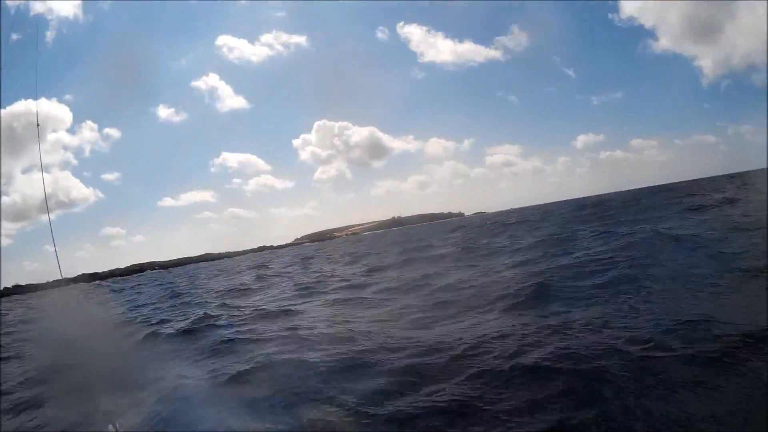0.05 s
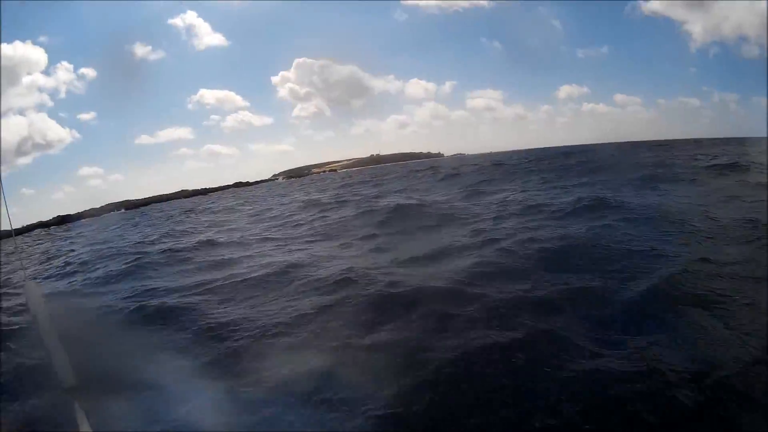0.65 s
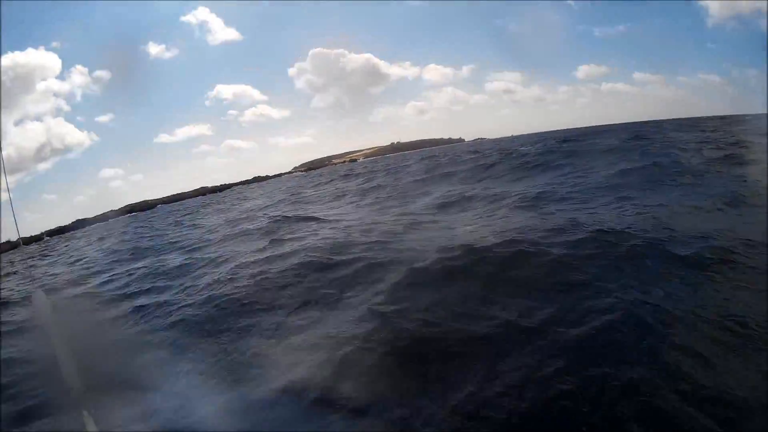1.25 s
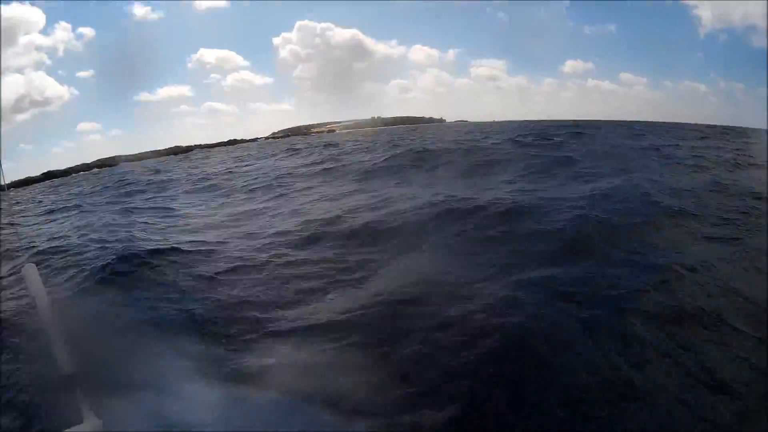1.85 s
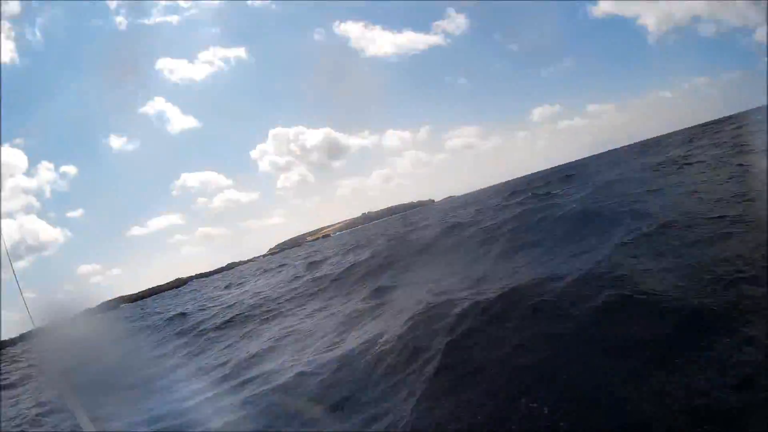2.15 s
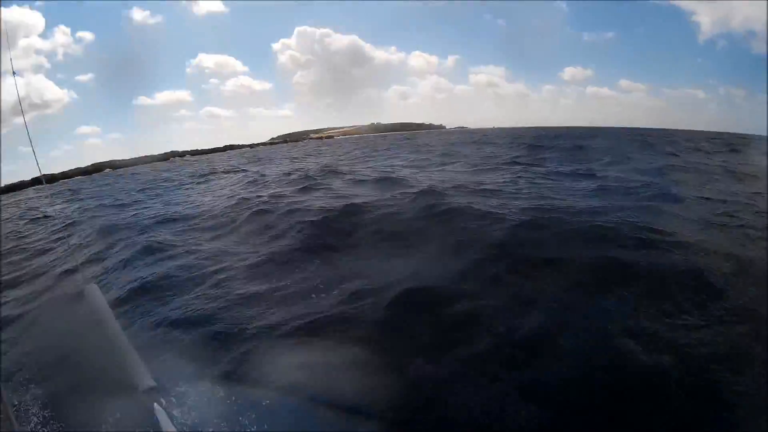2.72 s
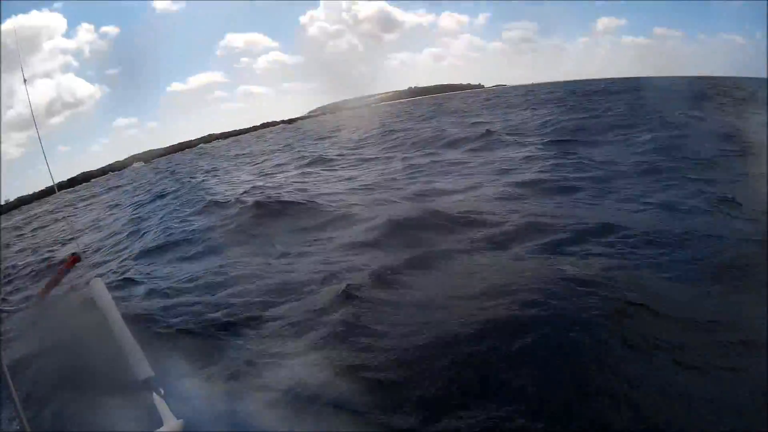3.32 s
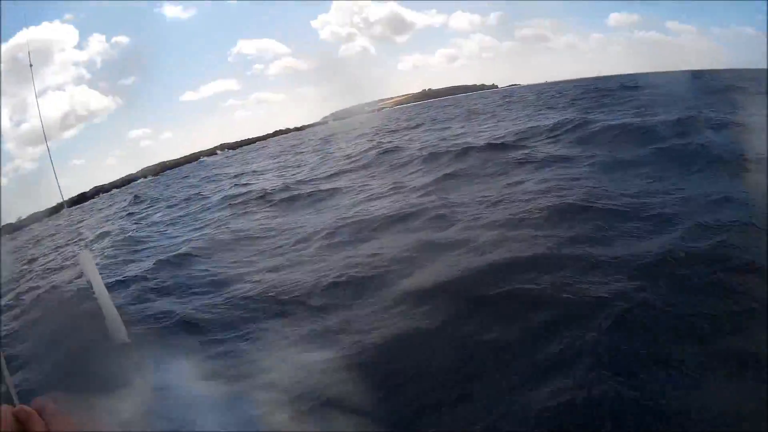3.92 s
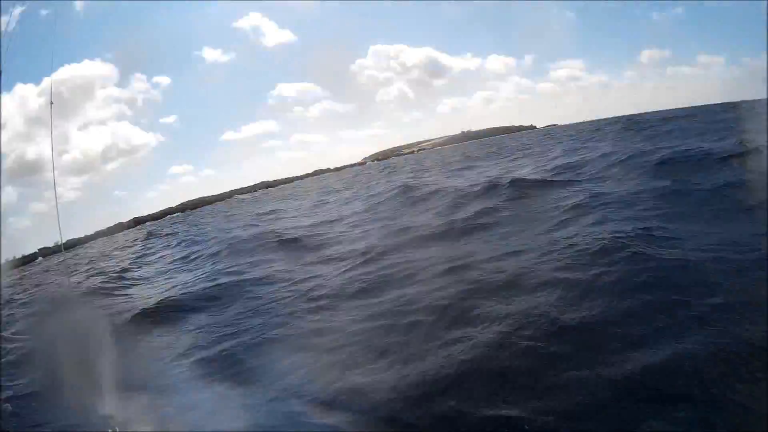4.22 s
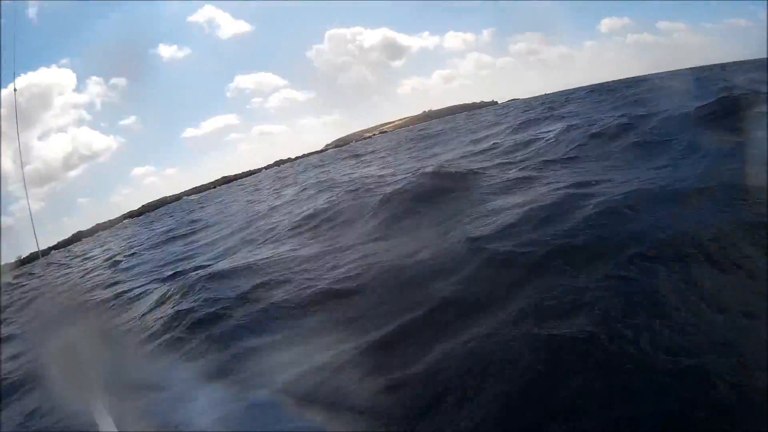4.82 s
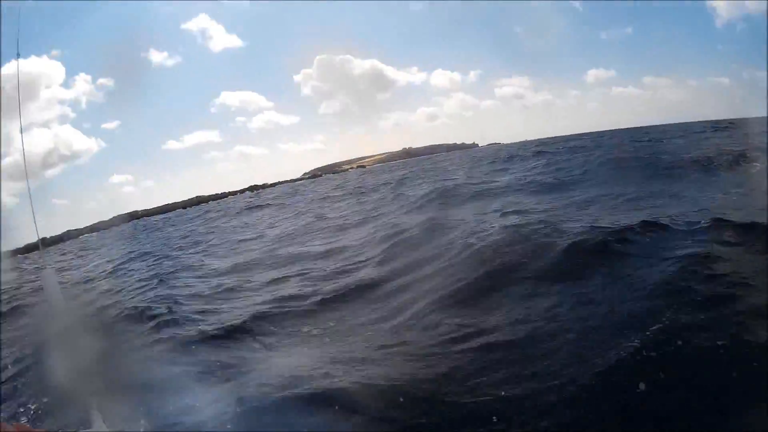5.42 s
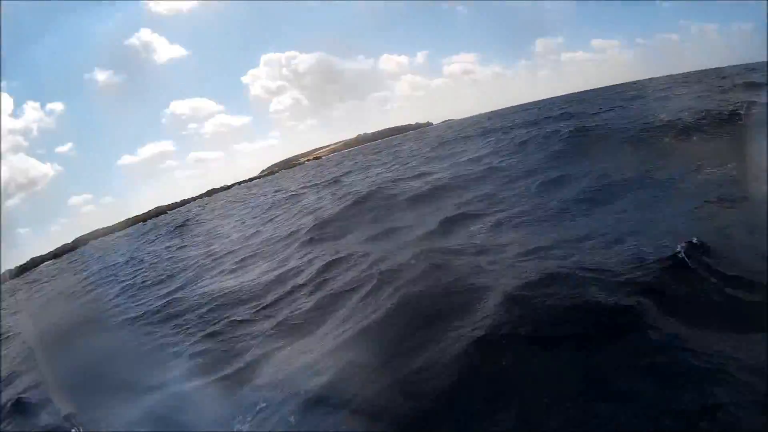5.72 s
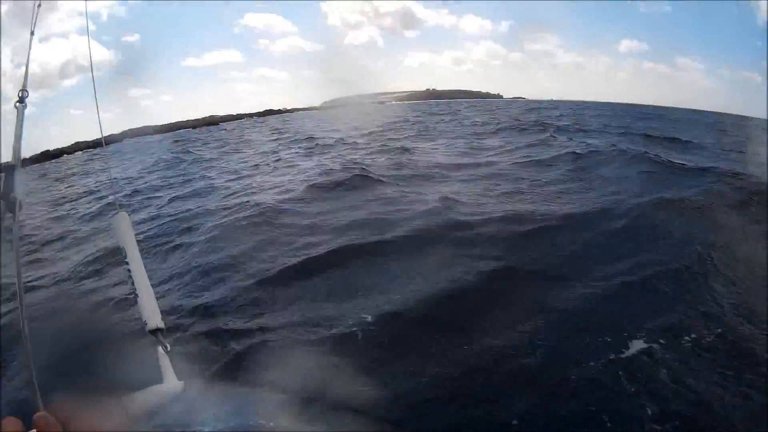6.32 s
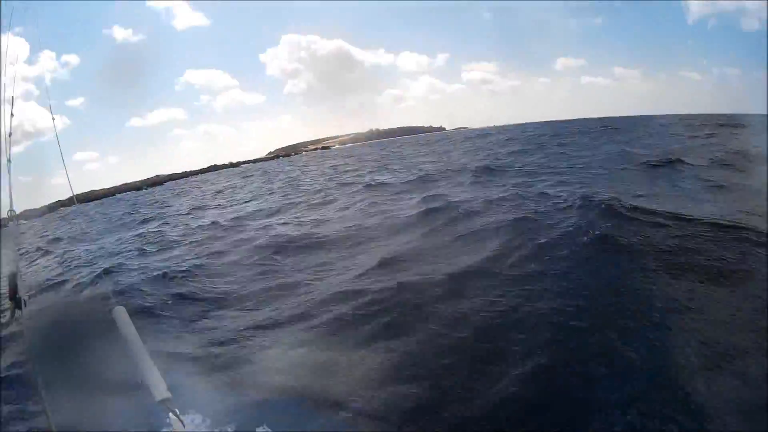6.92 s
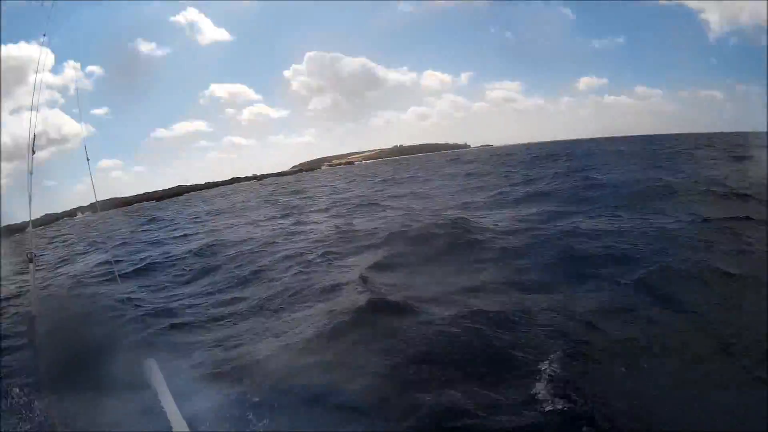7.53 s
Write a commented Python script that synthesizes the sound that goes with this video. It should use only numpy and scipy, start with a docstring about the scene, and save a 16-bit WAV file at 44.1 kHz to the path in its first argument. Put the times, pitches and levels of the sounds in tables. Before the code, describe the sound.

A dull rush of water and wind runs throughout as a small boat crosses choppy sea, heard from inside a waterproof case on deck. Fizzing wash, hollow slosh and low rumble swell and ease together, sounding muffled and boxy. At about 2.2 seconds a wave thumps the hull and the plastic mount knocks and snaps. More knocks and ticks follow until 3.2, with a short water gulp near 2.7 and another thump at 3.1. At 3.6 seconds spray slaps the case sharply and a few drops spatter after it. The heaviest low thump comes at 4 seconds, followed by sharp ticks. The rush swells around 5 seconds with a light knock, then drops as a single drop taps at 5.6. Softer thumps with knocks come near 6 and 6.5, a hollow gulp at 6.7, and a last soft thump and snap around 7.4 seconds.

```python
"""A dull rush of water and wind: a small boat in choppy sea, heard inside a waterproof camera case on deck.
Bow wash, slosh and rumble swell and ease together, boxed in by the closed case's resonances.
Each wave the hull meets gives a low thump, and the jolted mount knocks, ticks and snaps.
Now and then water gulps along the hull; midway, spray slaps and spatters on the case itself."""
import sys
import numpy as np
from scipy import signal
from scipy.fft import rfft, irfft
from scipy.io import wavfile
from scipy.ndimage import uniform_filter1d

SR = 44100
rng = np.random.default_rng(int(sys.argv[2]) if len(sys.argv) > 2 else 0)


def transcribe(signal):
    """Save signal, clipped to [-1, 1], as a 16-bit WAV file at the path in sys.argv[1]."""
    frames = np.atleast_2d(signal).T
    limited = np.clip(frames, -1, 1)
    pcm = np.round(limited * 32767).astype(np.int16)
    wavfile.write(sys.argv[1], SR, pcm)


N = 337806
TIME = np.arange(N) / SR


def undb(db):
    """Decibels to gain."""
    return 10 ** (np.asarray(db) / 20)


def unit(x):
    """Scale to rms 1."""
    return x / np.sqrt(np.mean(x ** 2))


def colour(x, eq):
    """Pass a sound through a minimum-phase, unit-energy EQ drawn as (freq_hz, gain_db) points."""
    size = 4096
    hz, db = np.transpose(eq)
    freqs = np.maximum(np.arange(size // 2 + 1) * SR / size, 1)
    octaves_above = np.maximum(np.log2(freqs / hz[-1]), 0)
    gain = undb(np.interp(np.log(freqs), np.log(hz), db) - 20 * octaves_above)
    cepstrum = irfft(np.log(gain))
    cepstrum[1:size // 2] *= 2  # folded, so nothing rings ahead of a hit
    cepstrum[size // 2 + 1:] = 0
    impulse = irfft(np.exp(rfft(cepstrum)))
    return signal.fftconvolve(x, impulse / np.sqrt(np.sum(impulse ** 2)))[:N]


def wander(rate_hz):
    """Smooth random drift with a spread near 1."""
    hold = int(SR / rate_hz)
    steps = rng.standard_normal(1024)[np.arange(N) // hold % 1024]
    return 1.3 * uniform_filter1d(uniform_filter1d(steps, hold), hold)


def crackle(per_s, spread_db):
    """Random tiny impacts, most small and a few large; rms 1."""
    fires = rng.random(N) < per_s / SR
    size = undb(spread_db * np.minimum(rng.exponential(size=N), 5))
    return unit(fires * size * np.sign(rng.standard_normal(N)))


def resonate(x, hz, width_hz):
    """One resonance, gain 1 at its centre."""
    return signal.lfilter(*signal.iirpeak(hz, hz / width_hz, fs=SR), x)


def hits(rows, eq):
    """One impulse per (start_s, level_db) row through an EQ, with the energy of 4 ms at that level."""
    impulses = np.zeros(N)
    for start_s, db in rows:
        impulses[int(start_s * SR)] += undb(db) * np.sqrt(0.004 * SR)
    return colour(impulses, eq)


def swing(peak_s, db, hz, half_s):
    """A few sine cycles that swell and die away around a moment."""
    t = TIME - peak_s
    return -undb(db) * np.sin(2 * np.pi * hz * t) * np.exp(-(t / half_s) ** 2)


def rush():
    """Swell in dB over cruising level: it builds as the bow digs into a wave, falls behind the crest."""
    # the rush of the boat's way: time_s, level_db
    contour = [(0, -51.5), (0.19, -49.5), (0.42, -53), (0.99, -54.5), (1.14, -51.5), (1.3, -53),
               (1.78, -49.7), (2.06, -52.5), (2.66, -52.5), (3.08, -53.5), (3.26, -56.5), (3.6, -54),
               (3.95, -57.5), (4.32, -53.9), (4.66, -53.5), (5.12, -49.1), (5.39, -49.5), (5.55, -56.9),
               (6.35, -56.5), (6.86, -55.5), (7.1, -52.2), (7.65, -53.5)]
    cruise_db = -53
    return np.interp(TIME, *np.transpose(contour)) - cruise_db


def bow_wash(surge_db):
    """Fizzing water comes through the wall and sets the air in the case singing."""
    # wash through the case: freq_hz, gain_db
    wash_eq = [(550, -16), (760, -13), (900, -8.5), (1060, -8), (1370, 0.5), (1560, -6.5), (1850, -4.5),
               (2150, -12), (2550, -21), (3000, -23.5), (3800, -22), (4500, -22.5), (5300, -43)]
    # narrow resonances of the enclosed air: pitch_hz, width_hz, gain_db
    air_modes = [(1360, 135, -3.5), (2980, 150, -9), (3220, 160, -17), (3570, 57, -10)]
    fizz = unit(rng.standard_normal(N) + undb(-4.5) * crackle(per_s=900, spread_db=3.0))
    water = colour(fizz, wash_eq) * undb(-51.5 + 1.1 * surge_db)
    air = unit(sum(undb(db) * resonate(rng.standard_normal(N), hz, width) for hz, width, db in air_modes))
    wall = signal.butter(4, [1000, 4200], "bandpass", fs=SR, output="sos")  # keeps the treble out
    air = signal.sosfilt(wall, air) * undb(-62.5 + 1.3 * surge_db)
    return (water + air) * undb(1.18 * wander(22.066))


def slosh(surge_db):
    """Water churns hollowly along the hull."""
    # slosh through the case: freq_hz, gain_db
    slosh_eq = [(250, -25), (330, -13), (420, -1.5), (470, -3), (525, 2), (580, -7), (680, -14.5),
                (950, -28.5)]
    return colour(rng.standard_normal(N), slosh_eq) * undb(-51.5 + 0.82 * surge_db + 1.4 * wander(14))


def wind(surge_db):
    """Wind rumbles on the case, wavering as it swells with the rush."""
    # wind through the case: freq_hz, gain_db
    rumble_eq = [(15, -4.5), (35, -4.5), (75, 2.5), (125, -3), (200, -1.5), (290, -7.5), (420, -17.5)]
    return colour(rng.standard_normal(N), rumble_eq) * undb(-51.5 + 0.75 * surge_db + 1.34 * wander(9))


def hull_thumps():
    """Waves shove the hull: it swings for a cycle or two and settles, loose parts chattering faintly."""
    # the hull meets a wave: peak_s, level_db, pitch_hz
    thumps = [(0.798, -49, 33), (2.153, -30, 32.3), (3.083, -28.5, 38), (4.044, -20.5, 45),
              (5.973, -39.5, 42), (6.451, -38, 44), (7.336, -42, 36)]
    # tone of the loose parts: freq_hz, gain_db
    chatter_eq = [(300, -4), (600, 1), (900, -4), (1500, 2), (2300, -4), (3100, -8), (4200, -19),
                  (6000, -35)]
    half_cycles = 0.67  # half the length of a thump
    shove = sum(swing(s, db, hz, half_cycles / hz) for s, db, hz in thumps)
    settle = sum(swing(s + 0.08, db - 16, hz=22, half_s=0.063) for s, db, _ in thumps)
    strain = sum(undb(db) * np.exp(-((TIME - s + 0.01) * hz / half_cycles) ** 2) for s, db, hz in thumps)
    chatter = undb(-26.5) * strain * colour(crackle(per_s=890, spread_db=3.5), chatter_eq)
    return shove + settle + chatter


def mount_rattle():
    """The jolted mount knocks in its play; its hard plastic joint slips and snaps back with a buzz."""
    # knocks, slips and snaps: start_s, level_db
    knock_cues = [(2.1593, -31.5), (2.4192, -34), (2.8036, -38.5), (3.0721, -36.5), (3.204, -34.5),
                  (3.4125, -47.5), (4.9793, -41), (5.9873, -43.5), (6.51, -34), (6.5811, -41.5)]
    tick_cues = [(2.2098, -39.5), (2.8155, -38), (4.0943, -30.5), (4.2066, -45), (4.245, -34),
                 (4.3255, -50), (6.5326, -46.5), (7.0536, -48.5)]
    snap_cues = [(2.2254, -33.5), (3.099, -33.5), (7.4271, -42.5)]
    # each contact's tone inside the case: freq_hz, gain_db
    knock_eq = [(100, -12), (450, -5.5), (750, -9.5), (1100, -11), (1380, 8), (1570, 1), (1820, 4),
                (2100, 4.5), (2600, -30.5), (3100, -7.5), (3550, -11.5), (4400, -21), (5500, -43),
                (12000, -69)]
    tick_eq = [(150, -11), (600, -4), (1000, -21), (1450, -6), (1730, 3.5), (2200, -4), (2650, -0.5),
               (3600, -1.5), (4400, 5.5), (5100, -6), (6300, -25), (8300, -21.5), (10000, -42),
               (15000, -48.5)]
    snap_eq = [(150, -11.5), (500, 0.5), (1200, 0), (1650, 6), (2200, 0), (3000, -8.5), (3650, -9),
               (4150, 3), (5000, -17), (6200, -11), (9500, -18), (11000, -32), (12200, -22), (14500, -44)]
    knocks = hits(knock_cues, knock_eq)
    ticks = hits(bounce(tick_cues, second_db=-12.5), tick_eq)
    snaps = hits(bounce(snap_cues, second_db=-4), snap_eq)
    snaps = scatter(snaps, share_db=-2.5, decay_s=0.0016)
    return case_ring(knocks + ticks + snaps, ring_db=-49.5)


def case_ring(x, ring_db):
    """The case rings on briefly after a blow."""
    # modes of the shell: pitch_hz, t60_s, gain_db
    modes = [(417, 0.078, 2.5), (550, 0.051, 0), (1300, .035, -5), (1357, 0.027, 2.5), (1710, 0.023, -10),
             (1956, 0.024, 2), (3050, .02, 0), (3600, .02, -7)]
    t = TIME[:SR // 8]
    ring = sum(undb(db) * np.sin(2 * np.pi * hz * t) * undb(-60 * t / t60) for hz, t60, db in modes)
    return x + undb(ring_db) * signal.fftconvolve(x, ring)[:N]


def bounce(rows, second_db, gap_s=0.0048):
    """Each (start_s, level_db) contact and its weaker second strike."""
    return np.vstack([rows, np.add(rows, [gap_s, second_db])])


def scatter(x, share_db, decay_s):
    """An impact breaks up into smaller ones over the next few milliseconds."""
    t = TIME[:SR // 50]
    fragments = rng.standard_normal(len(t)) * np.exp(-t / decay_s)
    fragments /= np.sqrt(np.sum(fragments ** 2))
    return x + undb(share_db) * signal.fftconvolve(x, fragments)[:N]


def gulps():
    """Water gulps along the hull in short, hollow notes."""
    # each gulp: peak_s, level_db, half_length_s
    cues = [(2.65, -45.5, .03), (6.696, -39, 0.016), (7.5, -67, 0.062)]
    return sum(swing(s, db, hz=524, half_s=half_s) for s, db, half_s in cues)


def splash():
    """Lumps of water mostly slap the case wall, drops mostly thud and spatter, amid fine spray."""
    # lumps of water, before the mix gains: start_s, slap_db, thud_over_slap_db
    lumps = [(3.579, -29, -9), (3.6073, -28, -16), (3.6121, -22, -5), (3.6204, -33, 9), (3.6263, -36, 2)]
    # single drops, before the mix gains: start_s, thud_db, spatter_db
    drops = [(3.599, -34, -52), (3.6401, -25.5, -37.5), (3.6486, -40, -45), (3.6609, -40, -39),
             (3.6664, -34.5, -47), (3.6957, -33, -47.5), (5.5943, -36.5, -46)]
    # low, middle and bright tones of water on the wall: freq_hz, gain_db
    thud_eq = [(50, -24), (130, -2), (230, -6), (400, -3.5), (580, 3), (780, -12), (1200, -19.5),
               (3000, -62)]
    slap_eq = [(150, -7.5), (500, -9.5), (800, -18), (1120, -12.5), (1360, 4), (1580, -2.5), (1760, 1.5),
               (2100, -6), (2550, -23), (3300, -23.5), (4200, -20.5), (5500, -45), (12000, -57)]
    spatter_eq = [(1200, -3), (2700, 9), (3400, 5), (4400, -0.5), (5400, -8.5), (7500, -7.5), (9600, -16),
                  (11500, -14.5), (13000, -26), (15000, -30)]
    lump_cues = [(s, db) for s, db, _ in lumps]
    weighted_cues = [(s, db + weight_db) for s, db, weight_db in lumps]
    drop_cues = [(s, db) for s, db, _ in drops]
    burst_cues = [(s, db) for s, _, db in drops]
    thud = undb(-2.5) * hits(weighted_cues + drop_cues, thud_eq)
    slap = undb(0.5) * hits(lump_cues, slap_eq) + undb(-8.5) * hits(drop_cues, slap_eq)
    burst = undb(-22) * hits(lump_cues, spatter_eq) + hits(burst_cues, spatter_eq)
    spatter = undb(-5.5) * scatter(burst, share_db=2.0, decay_s=0.0022)
    flex = swing(peak_s=3.6136, db=-21.5, hz=210, half_s=0.0035)  # the heaviest lump bends the wall
    fine = fine_spray()
    spray = sum(undb(db) * colour(fine, eq) for eq, db in [(slap_eq, -3), (thud_eq, -5.5), (spatter_eq, -17.5)])
    return flex + case_ring(slap - thud + spatter + spray, ring_db=-52.5)


def fine_spray():
    """Each sheet of spray is a patter of tiny drops that swells fast and fades more slowly."""
    # sheets hitting the case: peak_s, level_db
    sheets = [(3.578, -38), (3.612, -22.5), (3.66, -39)]
    rise_s, fall_s = 0.0042, 0.013
    envelope = sum(undb(db) * np.exp(-np.maximum((s - TIME) / rise_s, (TIME - s) / fall_s))
                   for s, db in sheets)
    return crackle(per_s=1500, spread_db=2.0) * envelope


def scene():
    """A bed of water and wind under the hull, mount and splash, in mono."""
    surge_db = rush()
    bed = bow_wash(surge_db) + slosh(surge_db) + wind(surge_db)
    return (bed + hull_thumps() + mount_rattle() + gulps() + splash())[None]


def record(dry):
    """The camera adds its own faint hiss and cuts the top."""
    # microphone self-noise: freq_hz, gain_db
    hiss_eq = [(100, -6), (3000, -1), (6000, 1.5), (10000, 1), (15500, -0.5)]
    hiss = undb(-69.0) * colour(rng.standard_normal(N), hiss_eq)
    high_cut = signal.ellip(10, 0.2, 70, 15600, fs=SR, output="sos")
    return signal.sosfilt(high_cut, dry + hiss)


dry = scene()
out = record(dry)
transcribe(out)
```